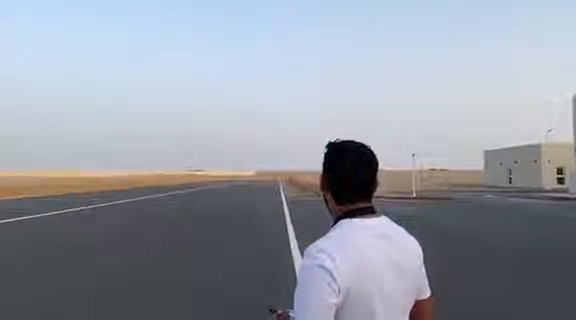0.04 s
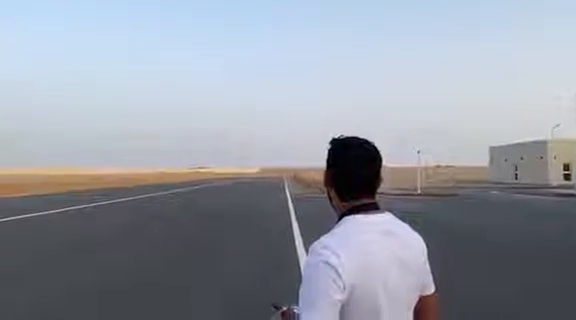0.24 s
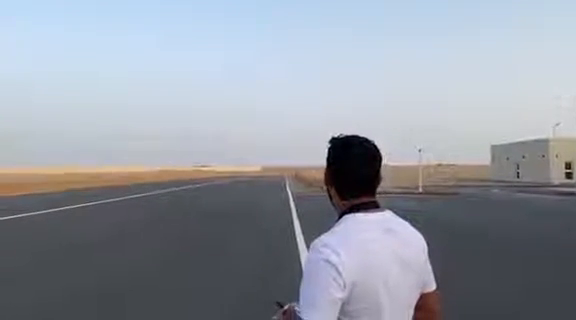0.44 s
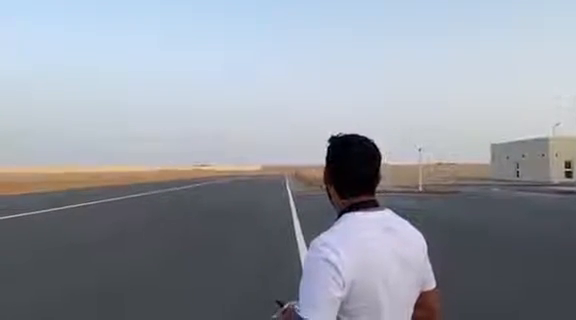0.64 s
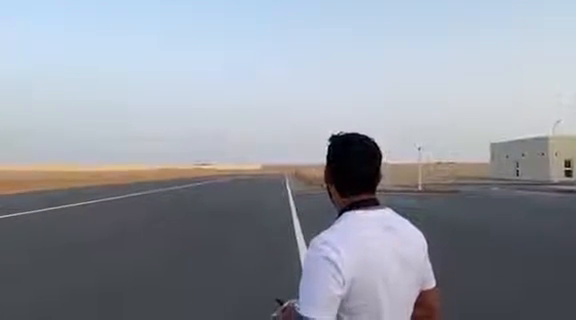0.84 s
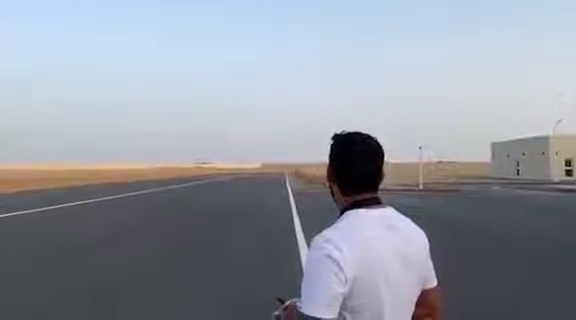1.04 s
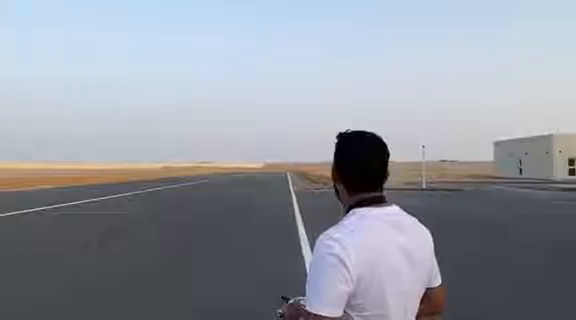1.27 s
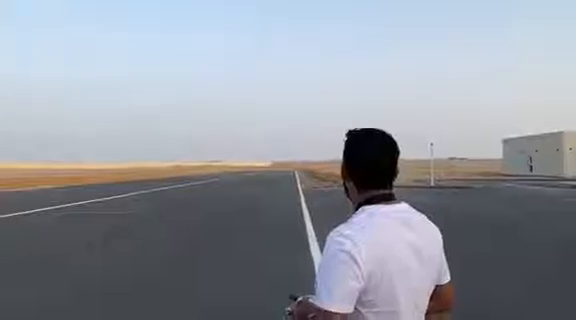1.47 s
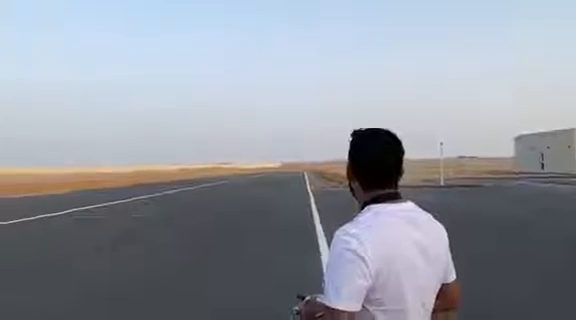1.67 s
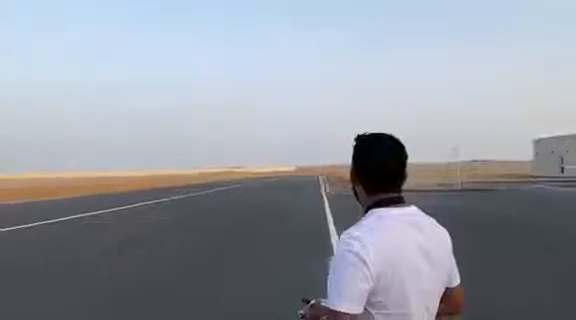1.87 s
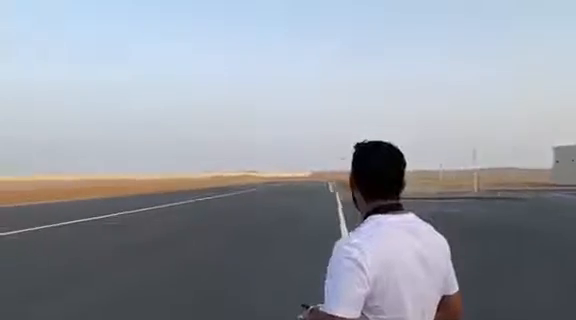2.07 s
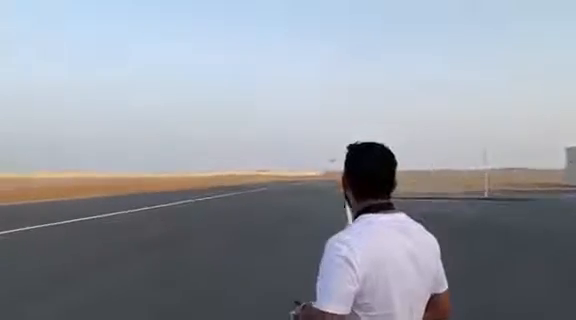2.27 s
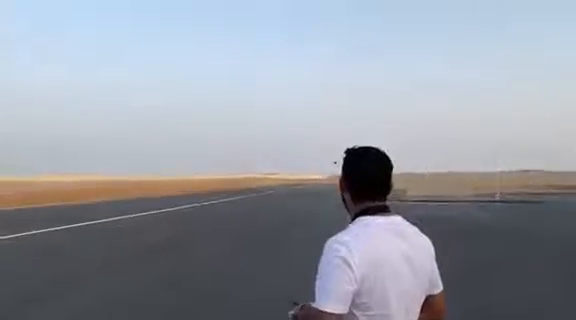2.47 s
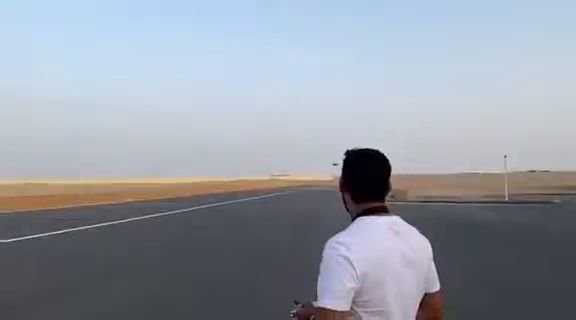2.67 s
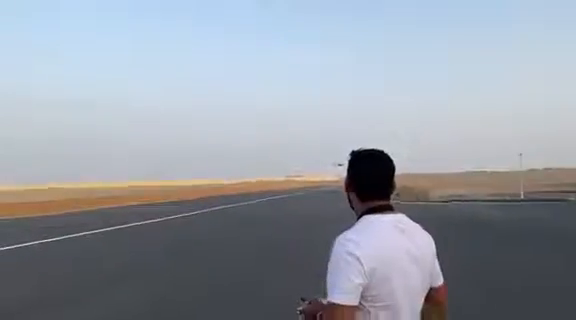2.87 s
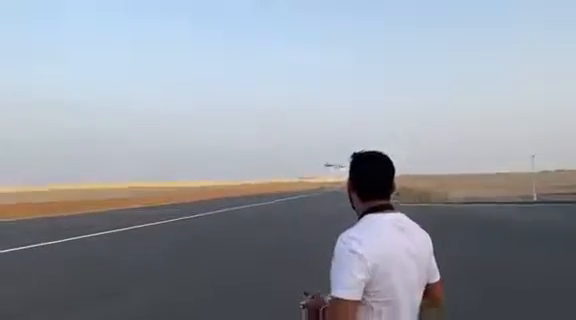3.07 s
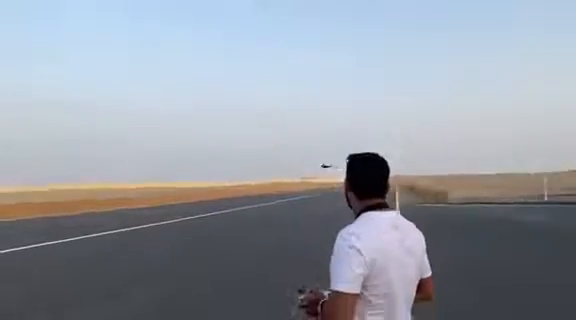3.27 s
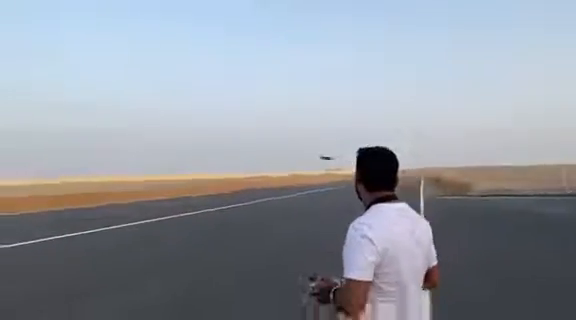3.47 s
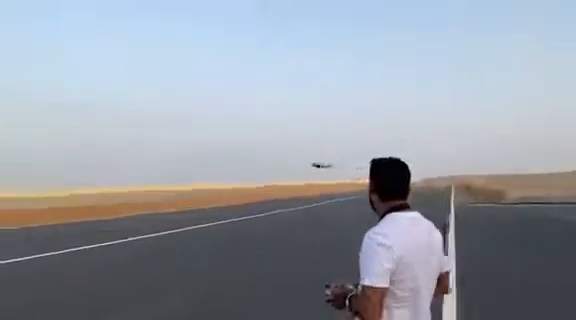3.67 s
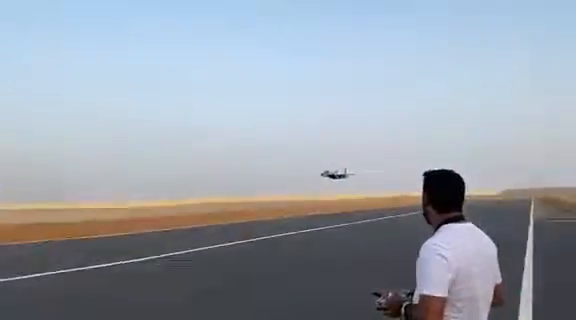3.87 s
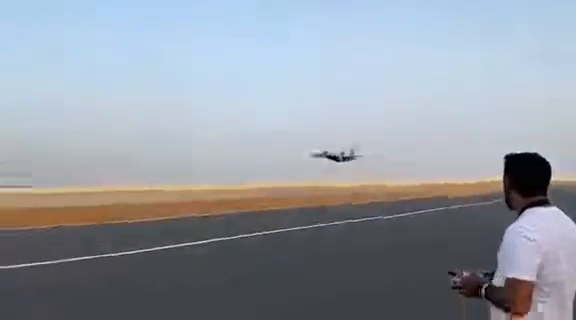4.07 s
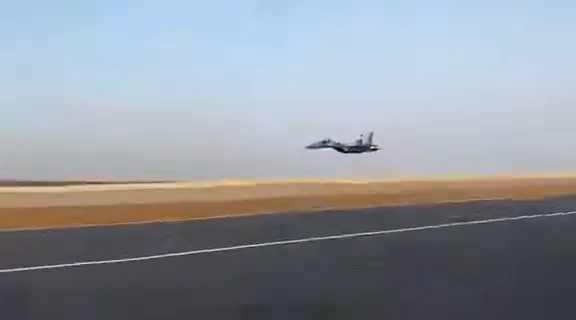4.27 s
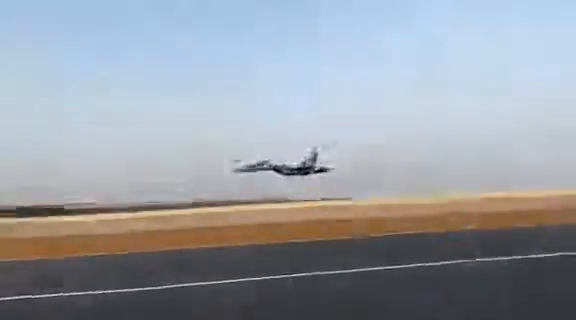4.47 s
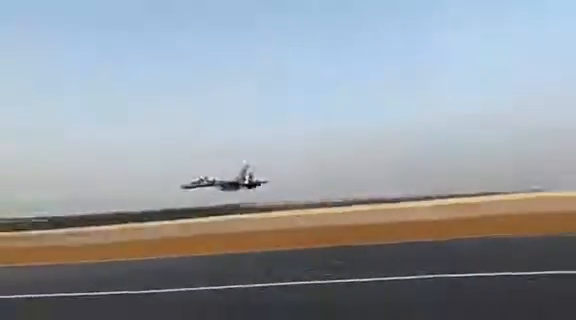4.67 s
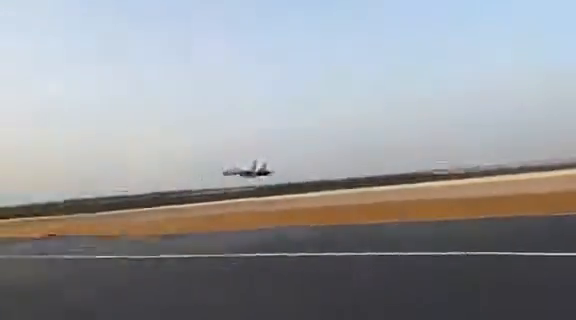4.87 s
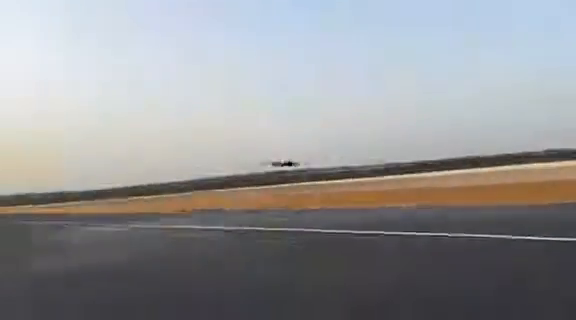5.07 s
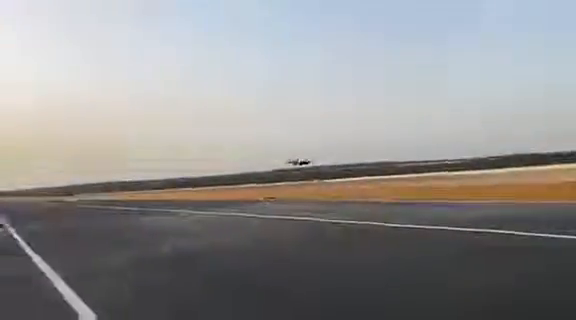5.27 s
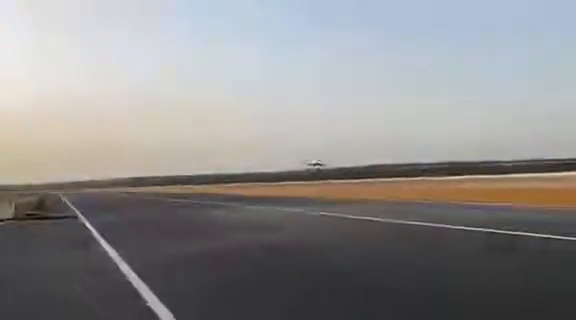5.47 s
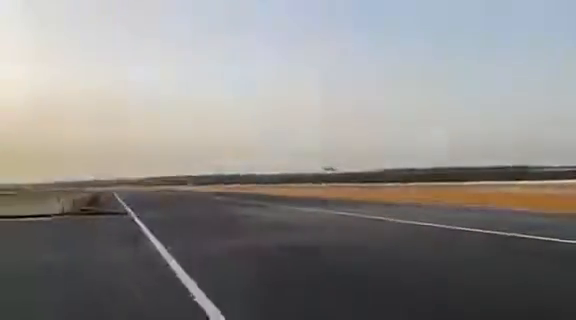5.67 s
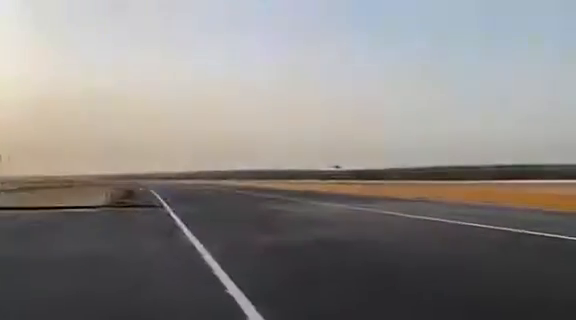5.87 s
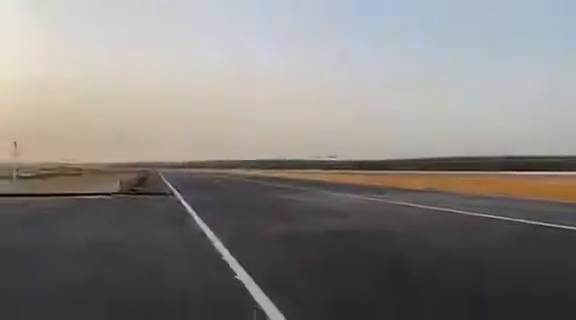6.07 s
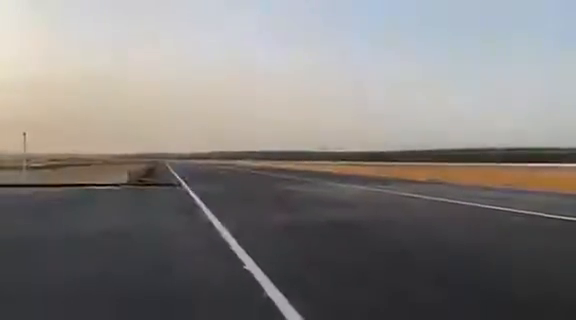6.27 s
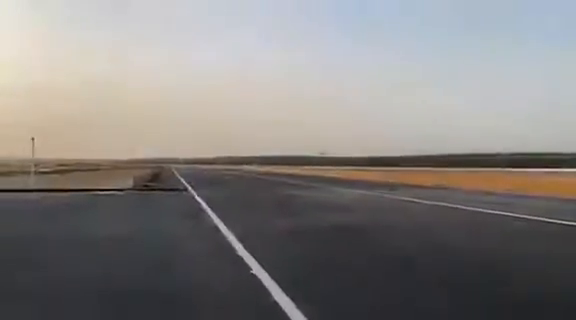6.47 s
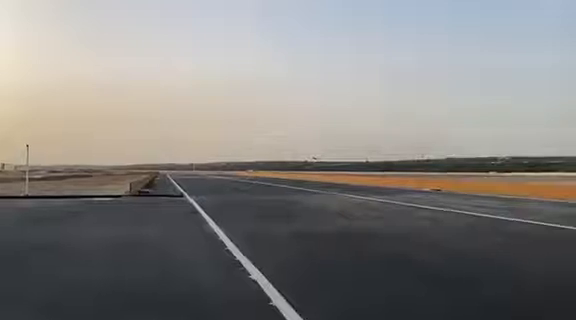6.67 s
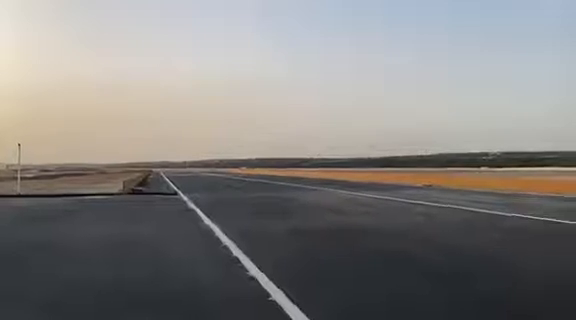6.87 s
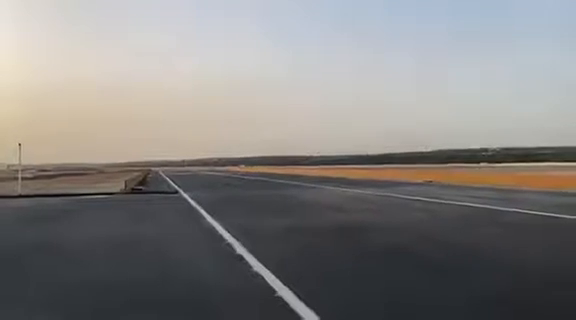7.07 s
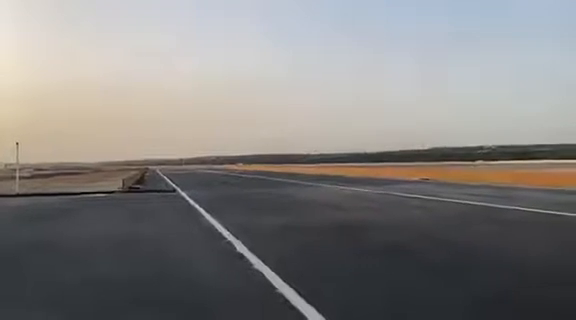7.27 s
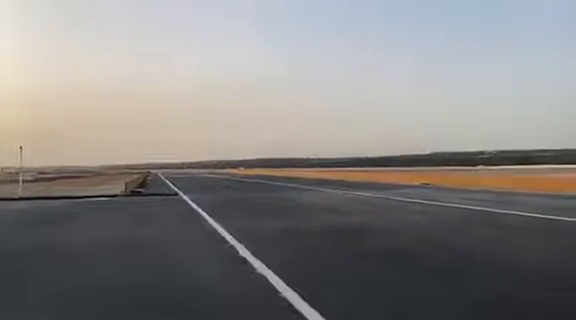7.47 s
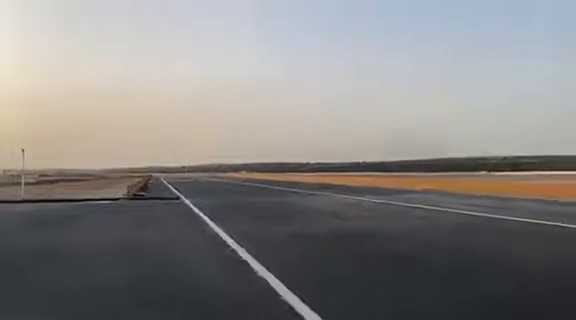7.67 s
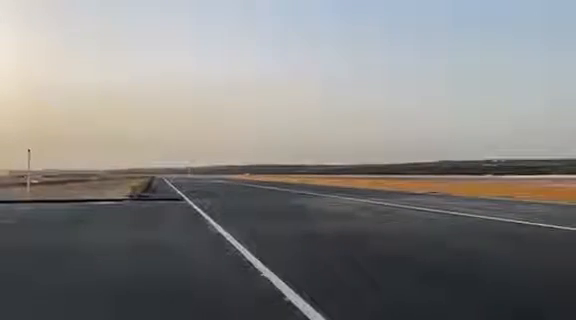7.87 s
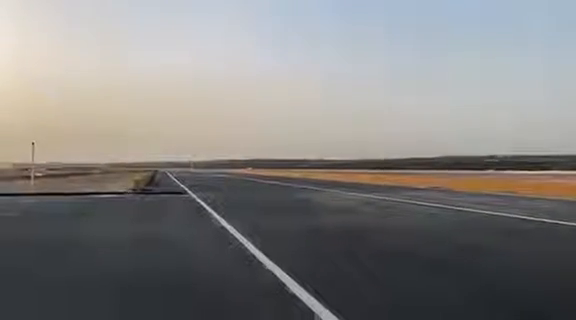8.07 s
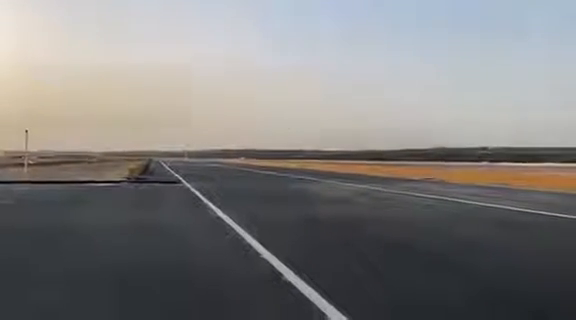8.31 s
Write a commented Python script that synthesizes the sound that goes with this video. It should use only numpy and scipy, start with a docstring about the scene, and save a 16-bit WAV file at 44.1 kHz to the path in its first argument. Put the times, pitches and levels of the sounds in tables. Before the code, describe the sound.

Wind thumps the microphone as a model jet's distant roar swells, whines and drops in pitch while passing, then powers away down the runway.

```python
"""A twin-turbine model jet comes in from far off, passes low along the runway and climbs away under more throttle.
First a breeze buffets and thumps the microphone while the exhaust roar, shaped jet noise, grows.
The roar mixes with its own reflection off the tarmac, so that notches sweep through it.
Near the closest point two pairs of sine whines stand out and drop in pitch by the Doppler effect.
Then the throttle opens: the whines rise, and the rumble and hiss strengthen, as the jet recedes."""
import sys
import numpy as np
from scipy import signal
from scipy.fft import rfft, irfft, next_fast_len
from scipy.io import wavfile
from scipy.ndimage import uniform_filter1d, map_coordinates

SR = 44100
rng = np.random.default_rng(int(sys.argv[2]) if len(sys.argv) > 2 else 0)


def store_wav(level_fs):
    """Save 16-bit WAV to argv[1]."""
    pcm = np.round(np.clip(np.atleast_2d(level_fs), -1, 1) * 32767)
    wavfile.write(sys.argv[1], SR, pcm.T.astype(np.int16))


N = 367794  # length in samples

TIME = np.arange(N) / SR  # seconds
FREQS = np.maximum(np.fft.rfftfreq(next_fast_len(N, real=True), 1 / SR), 1)  # Hz


def from_db(db):
    """Logarithmic level: 20 dB is a factor of ten in amplitude."""
    return 10 ** (np.asarray(db) / 20)


def rms_one(x):
    """Power normalisation: scale to unit rms."""
    return x / np.sqrt(np.mean(x ** 2) + 1e-20)


def in_time(rows):
    """Linear interpolation: each column of a timed curve at every sample."""
    seconds, *columns = np.transpose(rows)
    return [np.interp(TIME, seconds, column) for column in columns]


def swell(center_s, length_s):
    """Gaussian envelope: a bell-shaped rise and fall with this standard deviation."""
    return np.exp(-.5 * ((TIME - center_s) / length_s) ** 2)


def filtered(x, gain):
    """Linear filtering: multiply the spectrum by a gain at every frequency."""
    size = next_fast_len(N, real=True)
    return irfft(rfft(x, size) * gain, size)[:N]


def colour(points):
    """Spectral envelope: gain at every frequency, interpolated in dB over log frequency."""
    hz, db = np.transpose(points)
    return from_db(np.interp(np.log(FREQS), np.log(hz), db))


def band(low_hz, high_hz):
    """Band-pass response: gain with steep edges."""
    return 1 / np.sqrt((1 + (low_hz / FREQS) ** 10) * (1 + (FREQS / high_hz) ** 10))


def noise(gain):
    """Random sound: white noise shaped by a spectrum, at unit rms."""
    return rms_one(filtered(rng.standard_normal(N), gain))


def drift(rate_hz):
    """Slow random fluctuation: low-passed noise of spread 1, changing about rate_hz times a second."""
    return noise(1 / (1 + (FREQS / rate_hz) ** 2))


# The breeze's spectrum. Each row: frequency in Hz, relative density in dB per Hz.
BREEZE_SPECTRUM = [(20, -28), (40, -6.5), (60, 2.5), (95, 1.5), (135, -5), (190, -10.5), (400, -22),
                   (900, -84.5)]
# Its gusts. Each row: centre in seconds, level in dB, length in seconds.
GUST_SWELLS = [(0.06, -51, 0.14), (0.55, -48, 0.07), (0.82, -53, 0.2), (1.15, -43, 0.05),
               (1.46, -50, 0.041), (2.42, -53, 0.06), (4.27, -41, 0.025), (4.48, -51, 0.036),
               (5.3, -55, 0.53), (6.12, -48, 0.12), (6.95, -51, 0.47), (7.77, -45, 0.1), (8.2, -47.5, 0.17)]
# Sharper buffets. Each row: centre in seconds, level in dB, length in seconds.
BUFFET_SWELLS = [(0.125, -45, 0.03), (0.234, -39, 0.007), (0.35, -44, 0.028), (0.49, -39, 0.022),
                 (0.755, -43, 0.014), (0.857, -42, 0.023), (0.99, -42, 0.02), (1.16, -44, .03),
                 (1.85, -46, .02), (2.43, -39, 0.025), (3.12, -44, .04), (4.27, -34, .025),
                 (6.11, -32.5, 0.03)]
# Their spectrum. Each row: frequency in Hz, relative density in dB per Hz.
BUFFET_SPECTRUM = [(25, -22), (70, 6), (130, 2), (260, -3.5), (450, -12), (900, -21), (2000, -68)]
BREEZE_DB = -48  # level between gusts


def wind(lumpy_db=2):
    """Turbulent pressure at the microphone port: low lumpy noise, swelling in gusts and sharper buffets."""
    lumps = from_db(lumpy_db * drift(16))
    breeze = rms_one(noise(colour(BREEZE_SPECTRUM)) * lumps)
    gusts = sum(from_db(db) * swell(s, length_s) for s, db, length_s in GUST_SWELLS)
    buffets = sum(from_db(db) * swell(s, length_s) for s, db, length_s in BUFFET_SWELLS)
    return breeze * (from_db(BREEZE_DB) + gusts) + buffets * noise(colour(BUFFET_SPECTRUM))


# Single eddies on the microphone.
# Each row: centre in seconds, peak in dB before the bass cut, centre frequency in Hz.
EDDY_THUMPS = [(0.012, -33, 90), (0.064, -31, 90), (0.227, -26.5, 260), (0.238, -28, 90),
               (0.371, -28.5, 95), (0.474, -28, 85), (0.494, -28, 140), (0.527, -35, 210),
               (0.737, -34, 190), (0.805, -36, 400), (1.121, -29.5, 130), (1.139, -27.5, 380),
               (1.19, -34, 220), (2.42, -32, 160)]
BASS_CUT_HZ = 42  # the microphone's bass cut, applied to the thumps


def thumps():
    """Impulse and ringing: an eddy is one pressure swing, higher the smaller; the bass cut makes it swing on."""
    out = np.zeros(N)
    for center_s, peak_db, hz in EDDY_THUMPS:
        near = abs(TIME - center_s) < 2 / hz
        u = (np.pi * hz * (TIME[near] - center_s)) ** 2
        out[near] += from_db(peak_db) * (1 - 2 * u) * np.exp(-u)
    bass_cut = signal.butter(4, BASS_CUT_HZ, "high", fs=SR, output="sos")
    return signal.sosfilt(bass_cut, out + 1e-18)


# Height of the jet as it dives, levels out and climbs. Each row: time in seconds, height in m.
JET_HEIGHT = [(0.25, 15.5), (1.2, 8.5), (2.0, 3.8), (2.6, 3.0), (3.05, 3.5), (3.5, 2.98), (3.8, 3.06),
              (4.0, 3.24), (4.3, 3.46), (4.5, 3.25), (4.68, 3.68), (4.9, 3.58), (5.4, 3.56), (5.8, 3.9),
              (6.05, 3.85), (6.5, 4.55), (6.7, 5.0), (7.1, 5.9), (7.6, 7.7), (8.34, 10.2)]
CLOSEST_S, SPEED_M_PER_S, MISS_M = 4.532, 46.4, 21.0  # straight, steady pass, heard nearest at CLOSEST_S
SOUND_M_PER_S, MIC_HEIGHT_M = 343, 1.6


def flight():
    """Retarded time: distance (m), angle from the nose (deg) and reflection lag (ms) when the sound left."""
    mach, miss_s = SPEED_M_PER_S / SOUND_M_PER_S, MISS_M / SOUND_M_PER_S
    since = TIME - CLOSEST_S + miss_s
    root = np.sqrt((mach * since) ** 2 + (1 - mach ** 2) * miss_s ** 2)
    sent = (since - root) / (1 - mach ** 2)
    along = SPEED_M_PER_S * sent
    distance = np.hypot(along, MISS_M)
    angle = np.degrees(np.arctan2(MISS_M, -along))
    # extra path off the ground, for heights small beside the distance
    detour_m = 2 * in_time(JET_HEIGHT)[0] * MIC_HEIGHT_M / distance
    return distance, angle, 1000 * detour_m / SOUND_M_PER_S


# The throttle opening for the climb, shared by whines and exhaust.
# Each row: time in seconds, opening from 0 cruise to 1 full.
THROTTLE_OPENING = [(5.95, 0), (6.3, 0.2), (6.55, 0.455), (6.8, 0.76), (7.05, 1)]
# Low shaft whine, swelling and dipping as the notches sweep over it. Each row: time in seconds,
# pitch at the jet before throttle in Hz, level at the microphone in dB before turbine level and fading.
SHAFT_LINE = [(0, 2210, -76), (0.25, 2210, -69), (1.1, 2212, -66), (1.45, 2210, -68), (1.65, 2210, -59),
              (1.85, 2205, -55), (1.95, 2202, -63), (2.15, 2200, -62), (2.5, 2203, -56), (2.65, 2198, -62),
              (2.76, 2188, -55), (2.9, 2188, -60), (3.3, 2190, -58), (3.6, 2192, -64), (3.7, 2195, -46),
              (3.88, 2200, -44), (4.08, 2210, -53), (4.18, 2220, -37), (4.26, 2224, -37), (4.32, 2228, -46),
              (4.39, 2232, -39), (4.55, 2230, -37), (4.64, 2220, -49), (4.78, 2210, -34), (4.9, 2210, -47),
              (5.0, 2212, -43), (5.15, 2215, -43), (5.35, 2215, -56), (8.33, 2215, -66)]
# High turbine whine. Each row: time in seconds, pitch at the jet before throttle in Hz,
# level at the microphone in dB before turbine level and fading.
TURBINE_LINE = [(0.8, 8300, -115), (1.85, 8280, -90), (3.6, 8250, -82), (3.9, 8280, -64), (4.0, 8300, -64),
                (4.12, 8345, -51), (4.3, 8400, -48), (4.5, 8415, -44), (4.68, 8410, -46), (4.85, 8340, -50),
                (5.05, 8355, -54), (5.17, 8365, -49), (5.27, 8375, -57), (5.35, 8390, -46),
                (5.48, 8400, -61), (5.58, 8405, -67), (5.75, 8420, -54), (5.95, 8440, -70),
                (6.45, 8400, -90), (6.57, 8350, -72), (6.62, 8350, -78), (6.72, 8350, -63),
                (6.78, 8350, -95), (8.33, 8350, -110)]
# The near turbine, then the one shaded by the fuselage.
# Each row: share above the listed speed, level in dB.
TURBINE_PAIR = [(0, 3.3), (-0.003, -6)]
# Unsteadiness of the whines. The one row: quick jitter from ahead, the same from the side and slow wander,
# all as shares of the pitch, then fading in dB.
WHINE_UNSTEADINESS = (.0022, .004, .0012, 2.4)
SPOOL_UP = 0.36  # rise in turbine speed at full throttle, as a share


def whines(angle):
    """Doppler effect: sine lines from two turbines at nearly one speed, wavering and fading in uneven air."""
    throttle, = in_time(THROTTLE_OPENING)
    ahead, abeam, wander, fading_db = WHINE_UNSTEADINESS
    jitter = ahead + (abeam - ahead) * np.sin(np.radians(angle))
    doppler = 1 / (1 - SPEED_M_PER_S / SOUND_M_PER_S * np.cos(np.radians(angle)))
    speed = doppler * (1 + SPOOL_UP * throttle)
    out = np.zeros(N)
    for curve in (SHAFT_LINE, TURBINE_LINE):
        hz, level_db = in_time(curve)
        for offset, turbine_db in TURBINE_PAIR:
            pitch = hz * speed * (1 + offset + jitter * drift(60) + wander * drift(4))
            gain = from_db(turbine_db + level_db + fading_db * drift(27.0))
            out += gain * np.sin(2 * np.pi * np.cumsum(pitch) / SR)
    return out


# Passing swells of narrow noise bands, one of them thin as a whistle. # Each row: centre in seconds, level in
# dB, length in seconds, centre frequency in Hz, width in octaves.
NOISE_BAND_SWELLS = [(0.2, -63.5, 0.43, 2320, 0.098), (0.892, -65.5, 0.13, 6130, 0.065),
                     (1.355, -61, 0.17, 6100, 0.15), (1.56, -50.5, 0.078, 3940, 0.19),
                     (2.01, -48, 0.041, 2750, 0.13), (2.05, -47.5, 0.066, 2200, 0.21),
                     (2.067, -43, 0.045, 2500, 0.0062), (2.707, -41.5, 0.31, 1077, 0.11),
                     (4.2, -36.5, 0.16, 420, 0.17), (4.224, -35.5, 0.19, 2800, 0.14),
                     (4.36, -35, 0.04, 2920, 0.04), (4.833, -25, 0.07, 1416, 0.038),
                     (5.63, -44.5, 0.27, 730, 0.2), (6.649, -39.5, 0.056, 3820, 0.41),
                     (7.205, -42, 0.052, 4000, 0.44), (7.05, -38, 0.64, 661, 0.48),
                     (7.294, -45.5, 0.2, 1080, 0.18)]


def noise_band_swells():
    """Narrow-band noise: a Gaussian band in frequency under a Gaussian swell in time."""
    out = np.zeros(N)
    for center_s, db, length_s, hz, width_octaves in NOISE_BAND_SWELLS:
        gain = np.exp(-.5 * (np.log2(FREQS / hz) / width_octaves) ** 2)
        out += from_db(db) * swell(center_s, length_s) * noise(gain)
    return out


def scattered(x, share, reach_ms=6.0, count=4):
    """Scattering: eddies in the air add weak late paths that come and go, so the colour shifts unevenly."""
    lags = (rng.uniform(.15, 1, count) * reach_ms * SR / 1000).astype(int)
    return x + share * sum(drift(6.7) * np.roll(x, lag) for lag in lags)


def over_tarmac(x, lag_ms, strength):
    """Comb filtering: direct sound plus its late copy off the ground, at even power."""
    late = map_coordinates(x, [np.arange(N) - lag_ms * SR / 1000], order=3, mode="wrap")
    both = x + strength * late
    return both / np.sqrt(uniform_filter1d(both ** 2, SR // 8) + 1e-12)


def carried_db(distance, angle, astern_db, air_db):
    """Spherical spreading and air absorption, with the difference between nose and tail."""
    astern = (1 - np.cos(np.radians(angle))) / 2
    spreading_db = 20 * np.log10(distance / MISS_M)
    return astern_db * astern - spreading_db - air_db * (distance - MISS_M) / 100


# Exhaust colour from in front. Each row: frequency in Hz, relative density in dB per Hz.
NOSE_SPECTRUM = [(100, -12.5), (200, -6), (400, -1), (700, 5), (1080, 9), (1350, 1), (1600, 1.5),
                 (1900, -5), (2450, -11), (2800, -18.5), (4000, -7), (4900, -11), (5400, -19), (7000, -9.5),
                 (9500, -29)]
# Exhaust colour from the side. Each row: frequency in Hz, relative density in dB per Hz.
FLANK_SPECTRUM = [(100, -10.5), (175, 5), (240, 11), (330, 3.5), (500, 3), (780, 9), (1200, 4),
                  (1550, -2.5), (1780, -14), (2300, -19.5), (2900, -24.5), (4400, -22), (5150, -30.5),
                  (6600, -18.5), (7800, -24.5), (9500, -34.5)]
# Exhaust colour from behind. Each row: frequency in Hz, relative density in dB per Hz.
TAIL_SPECTRUM = [(100, -4.5), (170, 2), (240, 0.5), (340, 5), (500, -2), (720, 6), (1320, 1.5), (1650, 3),
                 (1950, -5.5), (2250, -7), (3000, -21.5), (3800, -10), (4500, -10.5), (5800, -20),
                 (7100, -20.5), (8300, -31.5), (9500, -51.5)]
# Exhaust colour from far astern, where the jet's own stream bends the sound aside.
# Each row: frequency in Hz, relative density in dB per Hz.
ASTERN_SPECTRUM = [(100, -1.5), (170, 0), (240, 1.5), (340, 2), (500, -3.5), (720, 2.5), (1000, 2),
                   (1320, -0.5), (1650, -7), (1950, -2.5), (2250, -13.5), (2800, -14), (3200, -16.5),
                   (3800, -13.5), (4500, -15), (5800, -18.5), (7100, -12.5), (8200, -22.5), (9500, -40.5)]
# The side shown. Each row: angle from the nose in degrees, view (0 nose, 1 flank, 2 tail, 3 far astern).
SIDE_SHOWN = [(21, 0.014), (44, 1), (65, 1.06), (92, 1.22), (118, 2), (148, 2.22), (160, 3)]
# Ranges of rumble, roar, hiss and sizzle. Each row: low edge in Hz, high edge in Hz,
# distance in m over which uneven air blurs the reflection.
NOISE_RANGES = [(118, 573, 490), (595, 2360, 300), (2195, 5220, 60), (6100, 41000, 55)]
# How the four ranges radiate. Each row: base level at the miss distance in dB, extra in the beam in dB,
# beam angle from the nose in degrees, beam width in degrees, extra astern in dB, extra at full throttle in dB,
# air loss in dB per 100 m.
RANGE_RADIATION = [(-25, -1, 143, 22, -3, 7.5, 0.5), (-24.5, 5.5, 136.7, 30, -1, 0, 1.5),
                   (-30.5, 5.5, 124.6, 3.9, -2, 6.5, 4), (-34.5, 11, 121.5, 16, -9.5, -1.5, 17.5)]
# How the four ranges arrive. Each row: reflection off the tarmac coming from 0 to 1, the same going,
# share scattered, flutter in dB.
RANGE_ARRIVAL = [(0.62, 0.7, 0.08, 1.0), (0.74, 0.86, 0.13, 0.6), (0.45, 0.58, 0.32, 0.7),
                 (0.25, 0.58, 0.38, 1.1)]
# Slow wavering of the whole exhaust. Each row: time in seconds, level in dB.
EXHAUST_LEVEL = [(0, 0.5), (0.7, -1.5), (1.3, 0), (1.95, 3.5), (2.4, 1), (2.9, 0), (3.7, -2), (4.1, 2),
                 (4.5, 3.5), (5.3, 0), (5.7, -1.5), (6.2, -0.5), (6.55, 3), (7.1, 1), (7.8, 1), (8.33, 6.5)]
# Treble: the hiss in full, the sizzle in part. Each row: time in seconds, level in dB.
TREBLE_LEVEL = [(0, -13.5), (0.45, -4), (0.9, 1), (1.35, -4), (1.6, -3), (2.2, 3), (2.9, 0.5), (3.45, 5.5),
                (3.9, 0.5), (4.45, -5), (4.68, -1), (4.9, 1), (5.01, 5.5), (5.08, 2), (5.35, 3.5), (6.2, 3),
                (7.2, 4), (7.55, 3.5), (8.1, 3)]
# The rumble. Each row: time in seconds, level in dB.
RUMBLE_LEVEL = [(0, -10), (0.9, -3), (1.8, -9), (2.3, -0.5), (2.85, -6), (3.3, 3), (3.65, 1.5), (3.9, 2.5),
                (4.15, -5.5), (4.48, 0), (4.75, -2.5), (5.85, 3), (6.15, 3.5), (6.7, -0.5), (7.4, 0.5),
                (7.85, 2.5), (8.33, -4)]


def exhaust(distance, angle, lag_ms, sizzle_follows=0.72):
    """Directional jet mixing noise: four ranges, coloured by the side shown; uneven air makes them flutter."""
    throttle, treble_db = in_time(THROTTLE_OPENING)[0], in_time(TREBLE_LEVEL)[0]
    overall_db = in_time(EXHAUST_LEVEL)[0]
    facing = np.clip(np.interp(angle, *np.transpose(SIDE_SHOWN)), 0, 3)
    views = []
    for k, points in enumerate((NOSE_SPECTRUM, FLANK_SPECTRUM, TAIL_SPECTRUM, ASTERN_SPECTRUM)):
        weight = np.sqrt(np.maximum(1 - abs(facing - k), 0))  # equal-power crossfade
        views.append((colour(points), weight))
    trims_db = (in_time(RUMBLE_LEVEL)[0], 0, treble_db, sizzle_follows * treble_db)
    out = np.zeros(N)
    for trim_db, radiation, limits, arrival in zip(trims_db, RANGE_RADIATION, NOISE_RANGES, RANGE_ARRIVAL):
        base_db, beam_db, beam_deg, width_deg, astern_db, throttle_db, air_db = radiation
        low_hz, high_hz, blur_m = limits
        coming, going, scatter, flutter_db = arrival
        window = band(low_hz, high_hz)
        jet = sum(weight * noise(window * gain) for gain, weight in views)
        # the treble mirrors less cleanly off the ground than the bass
        mirror = np.exp(-(distance / blur_m) ** 2) * np.interp(facing, [1, 2], [coming, going])
        beam = np.exp(-.5 * ((angle - beam_deg) / width_deg) ** 2)
        sent_db = base_db + throttle_db * throttle + beam_db * beam
        level_db = sent_db + carried_db(distance, angle, astern_db, air_db)
        level_db = level_db + overall_db + trim_db + flutter_db * drift(8.3)
        out += over_tarmac(scattered(jet, scatter), lag_ms, mirror) * from_db(level_db)
    return out


def scene():
    """Superposition: the wind and the jet add, in mono."""
    distance, angle, lag_ms = flight()
    breeze = wind() + thumps()
    jet = whines(angle) + noise_band_swells() + exhaust(distance, angle, lag_ms)
    return (breeze + jet)[None]


# Peaks and hollows of the microphone housing. Each row: centre in Hz, width in Hz, height in dB.
HOUSING_RESONANCES = [(722, 45, 1.5), (856, 132, -4.5), (1156, 60, -3), (5530, 220, -3), (5770, 310, 6),
                      (6070, 160, -5.5)]
CUTOFF_HZ = 9500


def record(dry):
    """Resonance and band limiting: the housing colours the sound; the top is cut steeply."""
    housing_db = sum(db / (1 + (2 * (FREQS - hz) / width_hz) ** 2) for hz, width_hz, db in HOUSING_RESONANCES)
    heard = filtered(dry[0], from_db(housing_db))
    top_cut = signal.ellip(12, .1, 90, CUTOFF_HZ, fs=SR, output="sos")
    return signal.sosfilt(top_cut, heard)[None]


dry = scene()
out = record(dry)
store_wav(out)
```